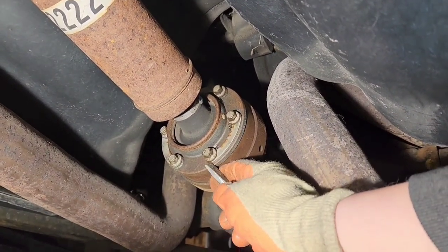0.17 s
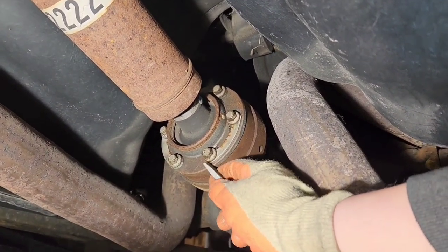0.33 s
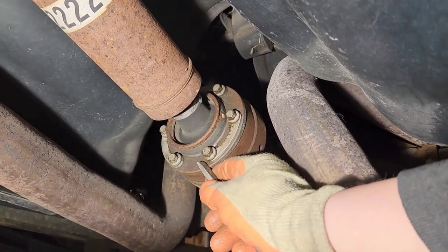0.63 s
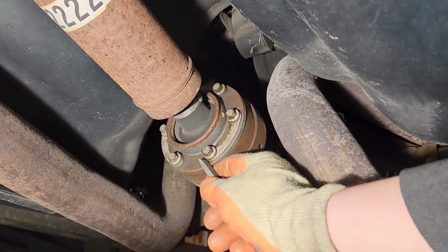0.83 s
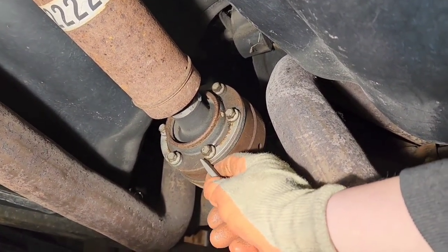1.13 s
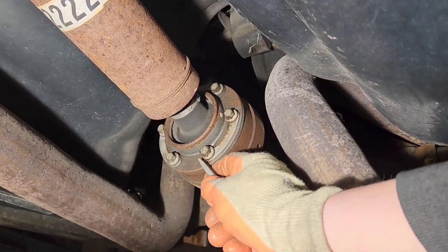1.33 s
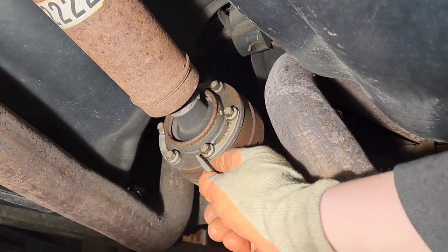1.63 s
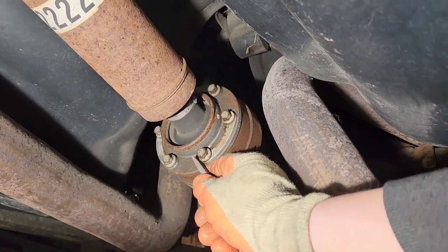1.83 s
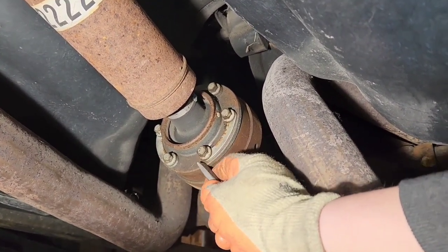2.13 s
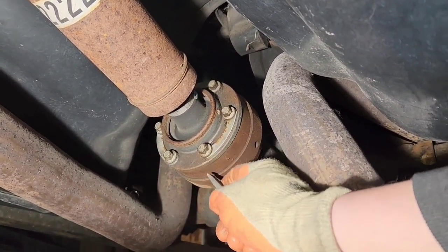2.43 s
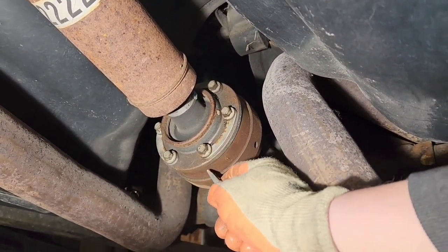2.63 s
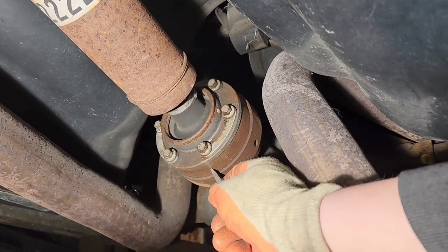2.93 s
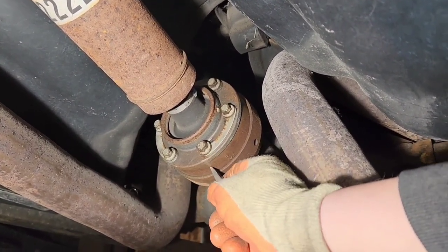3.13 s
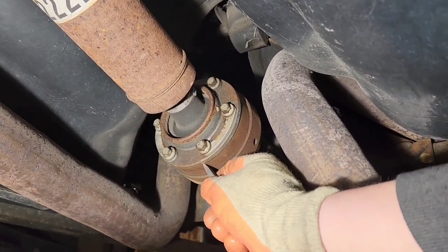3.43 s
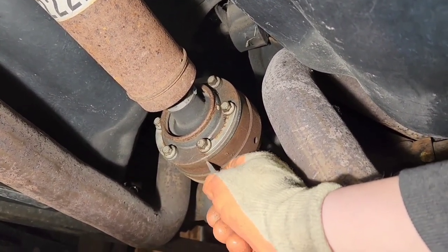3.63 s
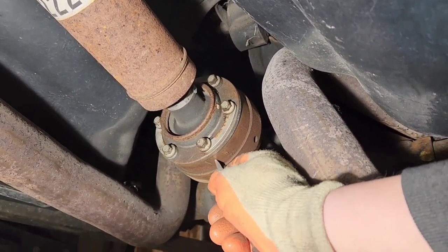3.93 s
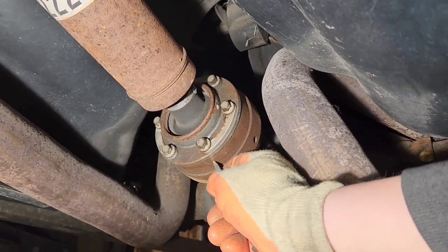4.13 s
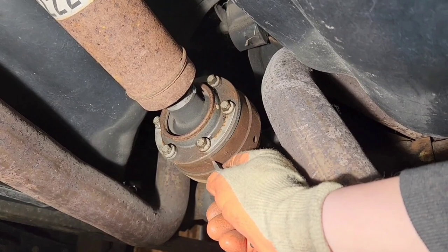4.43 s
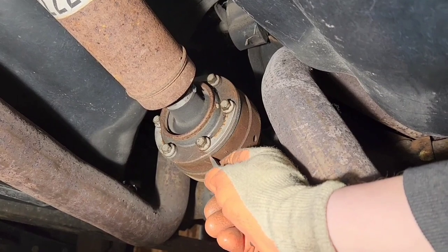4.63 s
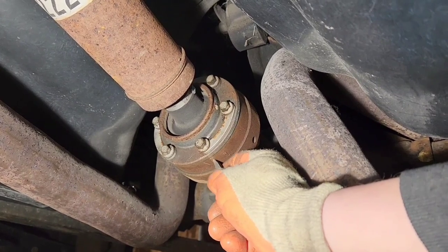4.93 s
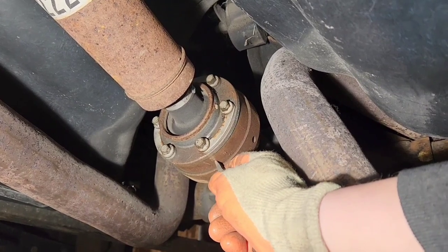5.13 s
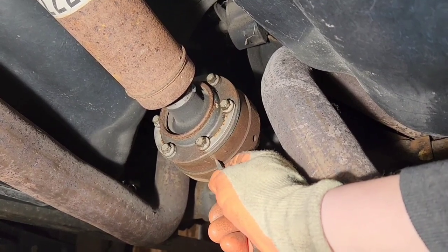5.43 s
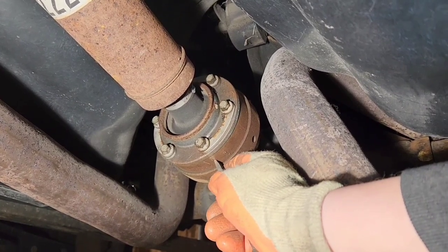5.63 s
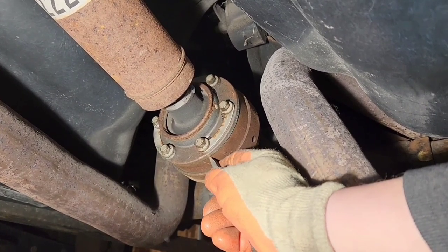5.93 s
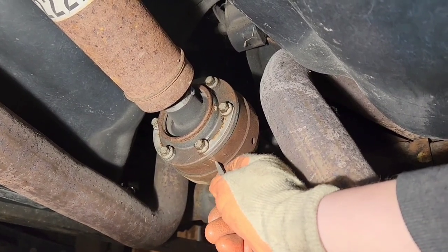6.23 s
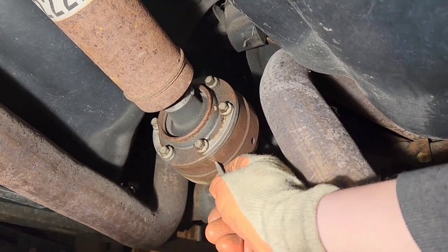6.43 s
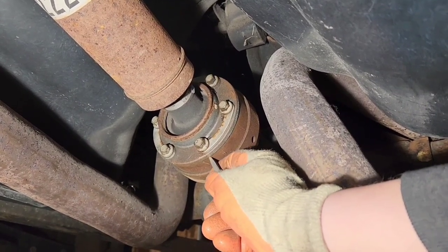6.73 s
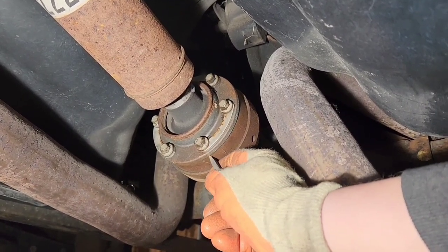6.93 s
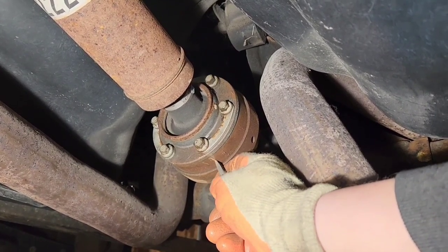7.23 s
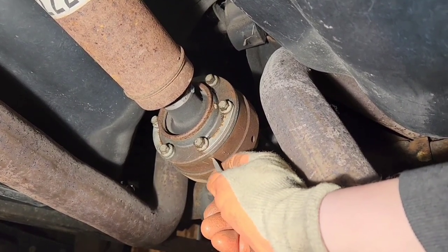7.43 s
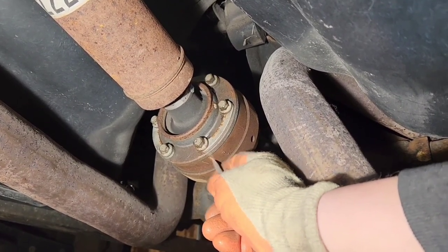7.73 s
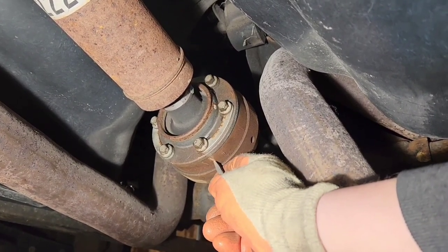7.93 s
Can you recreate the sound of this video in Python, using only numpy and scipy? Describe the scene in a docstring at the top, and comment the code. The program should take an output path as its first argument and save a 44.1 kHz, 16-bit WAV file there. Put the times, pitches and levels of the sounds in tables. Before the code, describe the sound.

A steel tool scratches rusty metal in short, dry scrapes, with sharp ringing knocks over a faint steady machine hum.

```python
"""Over a steady machine hum comes a dry scratching, broken by sharp, ringing knocks.
Under a car in a garage, a pointed steel tool scratches a mark across the rusty flanges (joining rims)
of a drive shaft. Rust crumbles under the tip and shakes the tool; strokes often end with the tip
slipping and knocking on the flange. The car's underside scatters the sound and booms softly."""
import sys
import numpy as np
from scipy import signal
from scipy.fft import rfft, irfft
from scipy.io import wavfile

SR = 44100
rng = np.random.default_rng(int(sys.argv[2]) if len(sys.argv) > 2 else 0)


def materialize(psi):
    """Save the field psi as 16-bit PCM at rate SR to the path in sys.argv[1].

    A 1-D psi becomes a single channel; in a 2-D psi each row is a channel.
    """
    bounded = np.clip(np.atleast_2d(psi).T, -1, 1)
    quanta = np.round(bounded * 32767).astype(np.int16)
    wavfile.write(sys.argv[1], SR, quanta)


N = 356328

# the tip strikes the flange: t/s, crack/dB, ring/dB, thud/dB, treble tilt/(dB per octave)
KNOCKS = [(.632, -22, -29, -27, 0), (2.428, -30, -31.5, -54, 0.5), (3.381, -15, -14.5, -17, 1),
          (3.958, -42.5, -43, -24, -6), (5.125, -30.5, -24.5, -35.5, -5), (6.312, -32.5, -23.5, -21.5, 1),
          (7.1206, -9.5, -16, -26, 1.5), (7.542, -22, -23.5, -37, -4), (7.817, -7.5, -16.5, -20.5, 0.5)]
# the tool's ringing tones, damped by a gloved hand: f/Hz, level/dB, fade time/s
TOOL_TONES = [(1080, 1, 0.0033), (1467, 1, 0.024), (2120, -9, 0.011), (2900, -25, 0.0047),
              (3174, 8.5, 0.012), (3490, 6.5, 0.0062), (7690, -3, 0.012), (14440, -18.5, 0.018)]
# tone colour (how strong each frequency is) of coarse rust breaking: f/Hz, level/dB
RASP_COLOUR = [(300, -9), (800, 3), (1400, 4), (2100, 1.5), (2600, 1), (3400, 2.5), (4400, 2), (6200, -0.5),
               (7700, 7), (8800, -3), (10000, -13.5), (16000, -29)]
# tone colour of fine grit: f/Hz, level/dB
GRIT_COLOUR = [(4000, -13.5), (8000, -17), (9500, 1), (11500, 9.5), (14500, 10), (16000, 7.5)]


def gain(db):
    """Turn decibels into a number to multiply by."""
    return 10 ** (np.asarray(db) / 20)


def fade(t, fade_s):
    """Die away, dropping 60 dB over the fade time."""
    return np.exp(-np.log(1000) * t / fade_s)


def wander(turns_per_s):
    """A random curve that drifts around zero, mostly between -1 and 1."""
    turns = np.arange(0, N + SR, SR / turns_per_s)
    return np.interp(np.arange(N), turns, rng.standard_normal(len(turns)))


def click(colour, tilt_db=0, size=1024):
    """A click of energy 1 with the given tone colour, tilted by tilt_db per octave."""
    hz, db = np.transpose(colour)
    octave = np.log2(np.maximum(np.arange(size // 2 + 1) * SR / size, 1))
    db = np.interp(octave, np.log2(hz), db) + tilt_db * np.clip(octave, np.log2(hz[0]), None)
    # pack the energy at the start without changing the colour
    cepstrum = irfft(np.log(gain(db)))
    cepstrum[1:size // 2] *= 2
    cepstrum[size // 2 + 1:] = 0
    sound = irfft(np.exp(rfft(cepstrum)))
    return sound / np.linalg.norm(sound)


def ring(tones, scatter_db=0):
    """Fading tones of total energy 1; scatter_db varies them, as hitting another spot would."""
    t = np.arange(SR // 2) / SR
    sound = np.zeros(len(t))
    for k, (hz, db, fade_s) in enumerate(tones):
        strength = gain(db + scatter_db * rng.standard_normal())
        sound += (-1) ** k * strength * np.cos(2 * np.pi * hz * t) * fade(t, fade_s)
    return sound / np.linalg.norm(sound)


def through(sound, response):
    """Filter a sound: each of its samples sets off a copy of the response."""
    return signal.oaconvolve(sound, response)[:N]


def add(track, start, sound):
    """Mix a sound in at start seconds."""
    i = int(start * SR)
    track[i:i + len(sound)] += sound[:N - i]


def garage(rumble_db=-49, side_db=-65.5, air_db=-65):
    """Wavering machine hum and rumble, nearly alike in both ears, with a hiss of air all around."""
    # the garage's rumble: f/Hz, level/dB
    rumble_colour = [(12, -52), (20, -29), (54, -3.5), (70, -1), (96, -5.5), (124, -3), (145, -15.5),
                     (174, -12.5), (290, -27.5), (303, -19.5), (325, -12), (349, -18.5), (403, -16),
                     (439, -26), (600, -28.5), (780, -71), (1320, -120)]
    # the machine's hum: f/Hz, level/dB, phase drift/rad
    hum_tones = [(74.4, -52.5, 1.23), (118.5, -58.5, 2), (322.8, -61.5, 0.23)]
    # the air's hiss: f/Hz, level/dB
    air_colour = [(300, -1), (600, 2), (1000, 2), (1500, -1), (2300, -5.5), (3000, -1.5), (4200, -17),
                  (6500, -27), (8000, -35.5), (10000, -38), (14000, -24.5), (16000, -32)]
    t = np.arange(N) / SR
    middle = gain(rumble_db) * through(rng.standard_normal(N), click(rumble_colour, size=16384))
    for hz, db, drift_rad in hum_tones:
        drift, swell_db = drift_rad * wander(4), 1.65 * wander(5)
        middle += np.sqrt(2) * gain(db + swell_db) * np.sin(2 * np.pi * hz * t + drift)
    side = through(rng.standard_normal(N), click(rumble_colour, tilt_db=6.5, size=16384))
    side = gain(side_db) * signal.sosfilt(signal.butter(2, 700, fs=SR, output="sos"), side)
    air = np.array([through(rng.standard_normal(N), click(air_colour)) for _ in range(2)])
    return np.array([middle + side, middle - side]) + gain(air_db) * air


def underside(sound, direct_db, near_db, far_db, near_fade_s=0.074, far_fade_s=0.4):
    """What reaches one ear: direct sound, quick echoes off the car's floor, the garage's faint tail."""
    t = np.arange(int(.8 * SR)) / SR
    hz = np.arange(len(t) // 2 + 1) * SR / len(t)
    noise = rfft(rng.standard_normal(len(t)))
    band_octaves = np.log2([500, 1500, 4000, 8000, 16000])
    echoes = np.zeros(len(t))
    for centre, weights in zip(band_octaves, np.eye(len(band_octaves))):
        band = irfft(noise * np.interp(np.log2(hz + 1), band_octaves, weights), len(t))
        octave = centre - band_octaves[2]
        shorter = 2 ** (-0.58 * max(octave, 0))  # treble dies first
        for db, fade_s in ((near_db, near_fade_s), (far_db, far_fade_s)):
            decay = fade(t, fade_s * shorter) * (1 - np.exp(-t / 0.00011))
            echoes += gain(db - 0.5 * octave) * band * decay / np.linalg.norm(decay)
    echoes[0] += gain(direct_db)
    return through(sound, echoes)


def booms(shudder_hz=82, shudder_fade_s=.23, sway_hz=47.5, sway_fade_s=0.63, rise_s=0.0061):
    """Heavy parts swing briefly, mostly just after the tip knocks on the flange."""
    # the shaft and the car's underside give way: t/s, shudder/dB, sway/dB
    swings = [(2.468, -25.5, -34.5), (2.555, -34, -47), (3.384, -32, -35.5), (4.679, -52, -41),
              (5.01, -53, -37.5), (6.152, -54, -42), (7.124, -35.5, -46), (7.824, -31.5, -49)]
    out, t = np.zeros(N), np.arange(SR) / SR
    rise = 1 - np.exp(-t / rise_s)
    shudder = np.sin(2 * np.pi * shudder_hz * t) * fade(t, shudder_fade_s)
    sway = np.sin(2 * np.pi * sway_hz * t) * fade(t, sway_fade_s)
    for start, shudder_db, sway_db in swings:
        add(out, start, rise * (gain(shudder_db) * shudder + gain(sway_db) * sway))
    return out


def clanks(clank_db=5.0, fade_s=0.21, rise_s=0.002):
    """At each knock, the many short-lived tones of the bolted parts blur into a clank."""
    # the bolted parts' clank: f/Hz, level/dB
    clank_colour = [(700, -10.5), (1300, -14), (1650, 1), (2050, -5), (2300, -5), (2700, -21), (4000, -33)]
    out, t = np.zeros(N), np.arange(SR // 4) / SR
    swell = fade(t, fade_s) * (1 - np.exp(-t / rise_s))
    for start, _, ring_db, _, _ in KNOCKS:
        clank = np.convolve(rng.standard_normal(len(t)) * swell, click(clank_colour))
        add(out, start, gain(ring_db + clank_db) * clank / np.linalg.norm(clank))
    return out


def flange(flange_db=7, dulling=0.32, treble_hz=2400):
    """Every knock leaves the heavy steel joint ringing with clear tones."""
    # the flange's own tones: f/Hz, level/dB, fade time/s
    flange_tones = [(1023, -12, 0.75), (1110, -4, .2), (1173, -13, 0.41), (1300, -16, 0.51),
                    (1380, 2.5, 0.13), (1642, 4, 0.29), (1705, -2.5, 0.51), (1675, 7, 0.093),
                    (2083, 13.5, 0.074), (2049, 1.5, 0.18), (2210, -2, 0.28), (2280, -14, 0.28),
                    (2380, -5, 0.15), (3625, -17, .35), (4680, -8.5, 0.23), (5400, -5, 0.14),
                    (5785, 8.5, 0.066), (7989, -18, .16)]
    out = np.zeros(N)
    hardest_db = max(knock[1] for knock in KNOCKS)
    for start, blow_db, ring_db, _, _ in KNOCKS:
        tilt_db = dulling * (blow_db - hardest_db)  # a soft blow hardly wakes the high tones
        tones = [(hz, db + tilt_db * max(np.log2(hz / treble_hz), 0), fade_s)
                 for hz, db, fade_s in flange_tones]
        add(out, start, gain(ring_db + flange_db) * ring(tones, scatter_db=1.5))
    return out


def impacts(crack_db=9, thud_db=2, catch_db=9, flake_db=4.0):
    """The slipping tip lands with a crack and a thud; it also catches and snaps off flakes of rust."""
    # the crack of steel on steel: f/Hz, level/dB
    crack_colour = [(150, -17), (600, -19), (850, -6.5), (1200, -6), (1700, -6), (2550, -9.5), (3100, 0),
                    (3900, -11.5), (4400, -4.5), (5800, -3), (7000, -13), (7900, -7.5), (10500, -23),
                    (16000, -32)]
    # the shaft's dull thud: f/Hz, level/dB
    thud_colour = [(150, -10), (450, -14.5), (750, 2.5), (1000, -1.5), (1350, 1), (1700, -6), (3000, -13),
                   (6000, -41)]
    # the tip catches and the tool twangs: t/s, level/dB
    catches = [(.632, -24), (3.956, -40), (4.996, -30.5), (5.007, -20), (6.138, -25.5), (7.092, -30.5),
               (7.797, -29.5)]
    # rust flakes snap off: t/s, level/dB
    flakes = [(1.679, -33.5), (2.299, -40), (2.678, -32), (2.737, -40), (2.753, -26), (2.819, -32.5),
              (2.867, -32), (3.171, -34.5), (7.431, -42)]
    out, t = np.zeros(N), np.arange(SR // 100) / SR
    for start, blow_db, _, dull_db, tilt_db in KNOCKS:
        chatter = .13 * rng.standard_normal(len(t)) * fade(t, .009)
        chatter[0] = 1  # the first touch
        # make all frequencies equally strong: chatter spreads the blow in time but keeps its colour
        spectrum = rfft(chatter, 2048)
        chatter = irfft(spectrum / np.abs(spectrum))[:len(t)]
        add(out, start, gain(blow_db + crack_db) * np.convolve(chatter, click(crack_colour, tilt_db)))
        add(out, start, gain(dull_db + thud_db) * click(thud_colour))
    for start, db in catches:
        add(out, start, gain(db + catch_db) * ring(TOOL_TONES))
    for start, db in flakes:
        add(out, start, gain(db + flake_db) * click(RASP_COLOUR))
        add(out, start, gain(db + flake_db - 10) * click(GRIT_COLOUR))
    return out


def pressure(start, length, growth_db):
    """One stroke's push: the tip digs in, the push grows or eases steadily, the hand lets go."""
    t = np.arange(N) / SR - start
    # the hand leans in and lets go faster on a short stroke
    rise_s, fall_s = 0.005 + .1 * length, 0.0037 + 0.16 * length
    edges = np.minimum(t, 0) / rise_s + np.minimum(length - t, 0) / fall_s
    progress = np.clip(t / length, 0, 1)
    return gain(growth_db * (progress - 1)) * np.exp(np.maximum(edges, -20))


def crumble(breaks_per_s=8000, spread_db=3.0, judder_db=2.0):
    """Rust gives way in many tiny breaks of uneven size, bunched by the juddering tip."""
    happens = rng.random(N) < breaks_per_s / SR
    size = gain(spread_db * np.minimum(rng.exponential(size=N), 4))
    judder = gain(judder_db * wander(260))
    breaks = happens * size * np.sign(rng.standard_normal(N)) * judder
    return breaks / np.sqrt(np.mean(breaks ** 2))


def scratching(rasp_db=2, grit_db=-1, tool_db=-4, rest_db=-83.5):
    """Each stroke crushes rust: a coarse rasp, fine grit, and the tool ringing with every break."""
    # strokes of the tip: t/s, length/s, end level/dB, growth/dB, grit offset/dB, tool ring offset/dB
    strokes = [ (0.469, 0.17, -67, -5.5, -2, -9), (1.684, 0.041, -59.5, 0, -4, -7),
               (1.803, 0.084, -62, -4.5, -7, -10), (2.130, 0.03, -69.5, -8.5, -7, -9),
               (2.429, 0.0093, -58, -3, -9, -4), (2.458, 0.041, -54, -3.5, 0, -11),
               (2.678, 0.21, -59, 5, -2, -18), (3.363, .015, -49.5, 7, -10, 6.5),
               (4.931, 0.0021, -63.5, 0, -16, 11.5), (5.003, 0.0072, -56, -4, -12, 8),
               (5.111, 0.012, -59, 1.5, -5, 7.5), (5.779, 0.041, -59, 2, -6, -4),
               (6.135, 0.014, -51, 2.5, -6, 8.5), (6.297, 0.0093, -62, 3, -3, -10),
               (6.707, 0.068, -58, 8, -5.5, -2), (7.093, 0.03, -48, 7.5, -5, 5.5),
               (7.495, .036, -56, 5.5, -4.5, 8), (7.797, 0.028, -45, 7, -8, 4.5),
               (8.070, 0.013, -59, 1.5, -6.5, 6.5), ]
    # the tip glides with little pressure: middle t/s, a quarter of the glide's length/s, level/dB
    glides = [(0.125, 0.046, -74.5), (0.305, 0.047, -75), (0.574, 0.099, -65), (0.977, 0.052, -76.5),
              (1.356, 0.16, -80), (2.21, 0.32, -79), (2.375, 0.025, -70), (3.078, 0.044, -76),
              (3.644, 0.073, -79.5), (4.557, 0.045, -76), (4.692, 0.02, -76), (6.248, 0.033, -73),
              (7.436, 0.017, -70.5)]
    # the gliding tip's whisper: f/Hz, level/dB
    glide_colour = [(1500, -7.5), (4500, -2.5), (6800, -5), (8000, 3), (9200, -12.5), (11000, -19.5),
                    (14500, -13.5), (16000, -27)]
    rasp, grit, tool = np.zeros((3, N))
    for start, length, db, growth_db, fine_db, ring_db in strokes:
        push = gain(db) * pressure(start, length, growth_db)
        rasp += push
        grit += push * gain(fine_db)
        tool += push * gain(ring_db)
    breaks = crumble()
    glide = gain(rest_db + 4 * wander(9.8))  # even the resting tip shifts a little
    for middle, quarter, db in glides:
        add(glide, max(middle - 2 * quarter, 0), gain(db) * np.hanning(int(4 * quarter * SR)))
    return (through(breaks * rasp, click(RASP_COLOUR)) * gain(rasp_db)
            + through(breaks * grit, click(GRIT_COLOUR)) * gain(grit_db)
            + through(breaks * tool, ring(TOOL_TONES)) * gain(tool_db)
            + through(breaks * glide, click(glide_colour)))


def scene(ring_right_db=-6):
    """The left ear faces the flange; the right one hears mostly echoes."""
    # the right side is shaded, most of all in the lower treble: f/Hz, level/dB
    shade_colour = [(500, 8), (900, 0.5), (1400, 8.5), (2200, 0), (3200, -3.5), (5500, 0), (8000, 0),
                    (11000, 7.5), (15000, 8.5)]
    scrape, hits, steel = scratching(), impacts() + clanks(), flange()
    left = underside(scrape, direct_db=4.5, near_db=-3, far_db=-8.5)
    left += underside(hits, direct_db=-1, near_db=-1.5, far_db=-18.5)
    right = underside(scrape, direct_db=-17, near_db=6.0, far_db=-12.5)
    right += underside(hits, direct_db=-9, near_db=-1.5, far_db=-14)
    right = through(right, click(shade_colour))
    work = np.array([left + steel, right + gain(ring_right_db) * steel])
    return work + booms() + garage()


def record(dry, top_hz=15850):
    """Cut away the very highest treble."""
    return signal.sosfilt(signal.ellip(10, .2, 70, top_hz, fs=SR, output="sos"), dry)


dry = scene()
out = record(dry)
materialize(out)
```